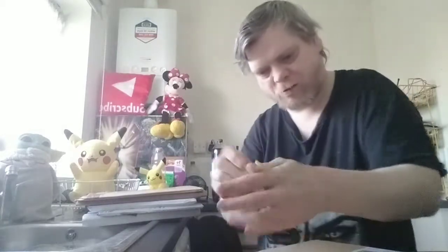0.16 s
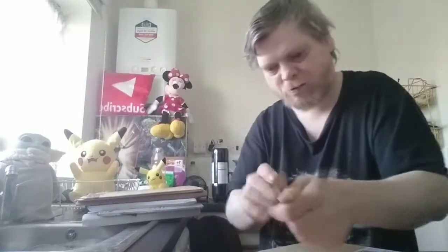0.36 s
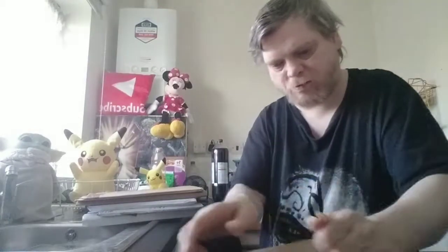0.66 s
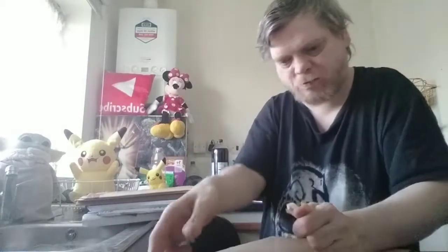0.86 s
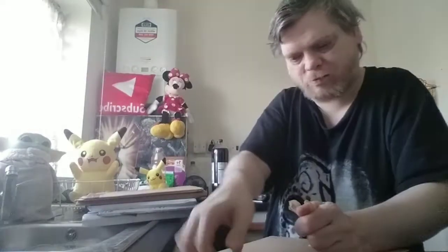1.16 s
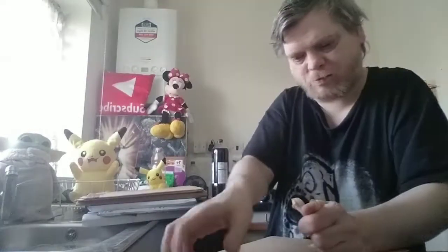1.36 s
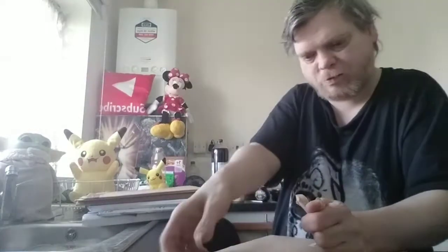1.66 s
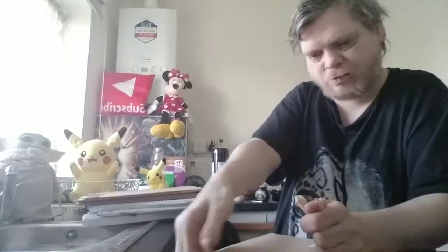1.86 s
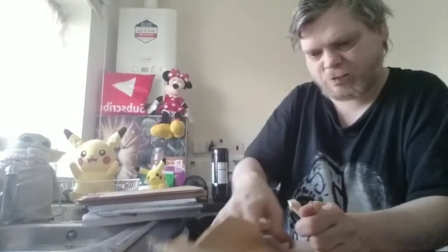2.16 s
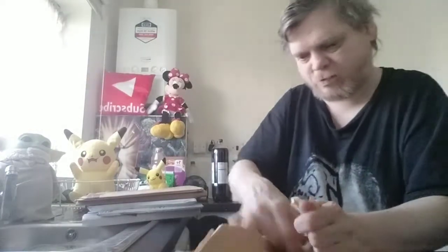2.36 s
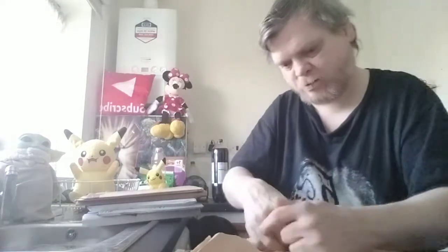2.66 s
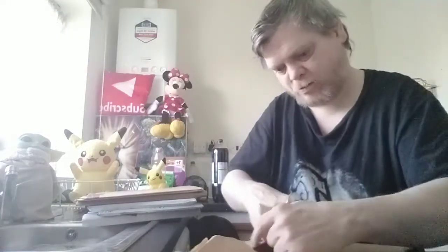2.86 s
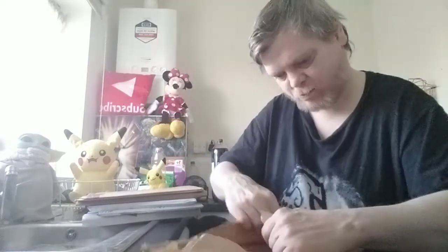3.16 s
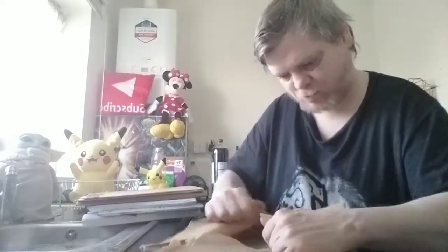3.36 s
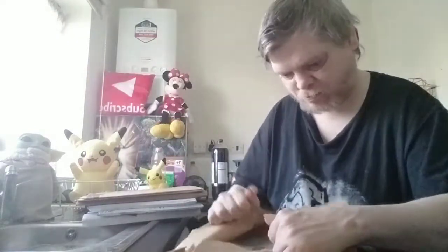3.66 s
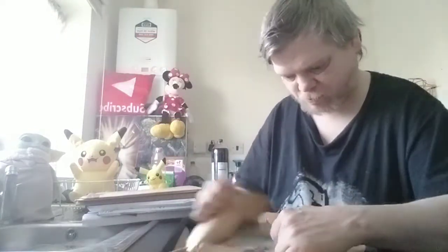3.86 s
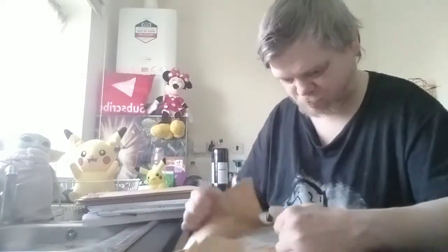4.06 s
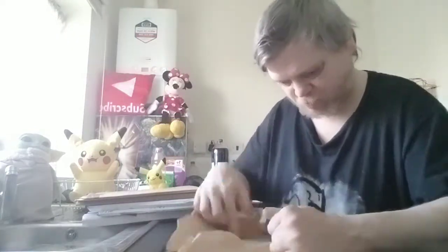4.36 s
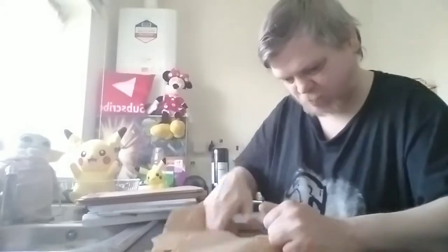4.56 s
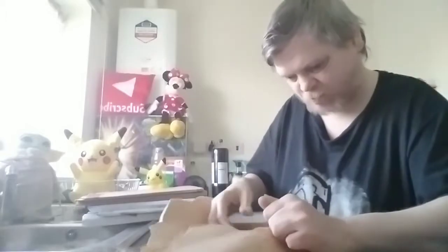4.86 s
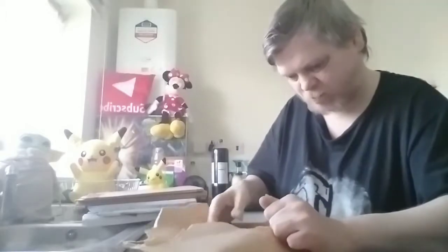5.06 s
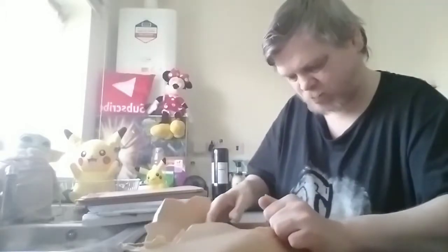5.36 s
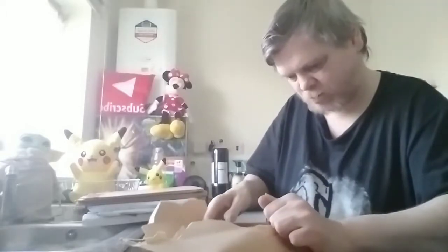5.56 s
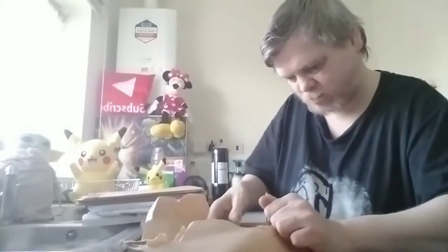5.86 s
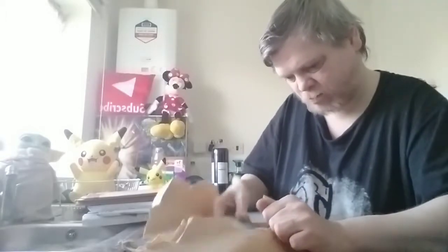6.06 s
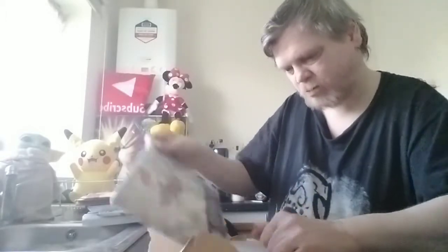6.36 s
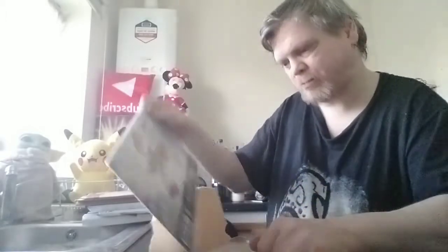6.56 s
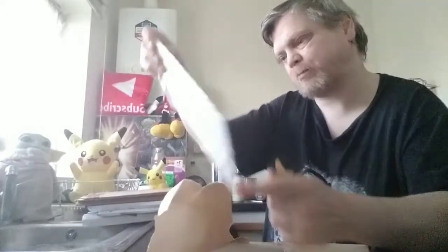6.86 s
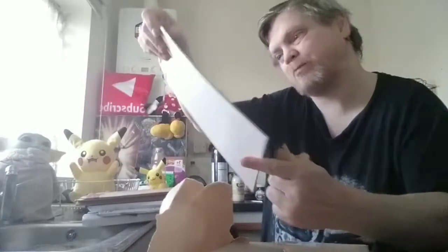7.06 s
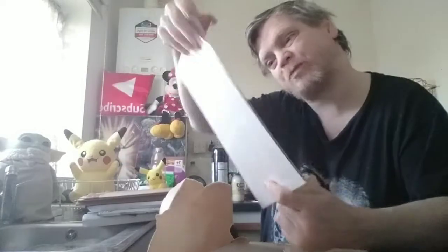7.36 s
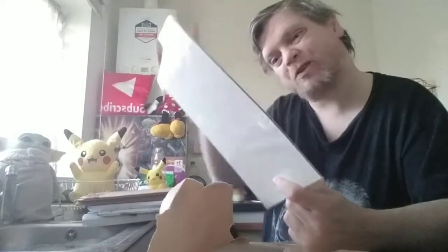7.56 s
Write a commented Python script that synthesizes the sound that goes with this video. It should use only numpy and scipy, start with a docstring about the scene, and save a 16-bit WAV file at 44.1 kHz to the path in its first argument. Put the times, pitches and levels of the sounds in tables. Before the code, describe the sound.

A cardboard mailer is torn open close by with crackling rips, snaps and table thuds, then paper slides softly out.

```python
"""A cardboard mailer is torn open on a table, close up, then paper sheets are drawn out of it.
Fibres crackle in clumps, glued seams and folds snap, the board flexes and booms, the table top thuds.
A smooth hollow hiss fills some quiet moments; a small furnished room answers every snap."""
import sys
import numpy as np
from scipy import signal
from scipy.fft import rfft, irfft, next_fast_len
from scipy.io import wavfile
from scipy.ndimage import uniform_filter1d, map_coordinates

SR = 44100
rng = np.random.default_rng(int(sys.argv[2]) if len(sys.argv) > 2 else 0)


def bounce(signal):
    """Save signal as a 16-bit WAV file at the path given by the first command-line argument."""
    frames = np.transpose(np.atleast_2d(signal))
    limited = np.clip(frames, -1, 1)
    pcm = np.round(limited * 32767).astype(np.int16)
    wavfile.write(sys.argv[1], SR, pcm)


N = 339570

# pulls and slides of the hands: (peak time [s], swell [s], hold [s], fibre level [dB], base fade [s],
# then relative to the fibres: rasp [dB], card [dB], fizz [dB], sheen [dB])
PULLS = [(0.0, .01, 0.0056, -55, .095, -14, -16, -17, -9), (0.161, 0.036, 0, -47, 0.31, -9.5, -11.5, 5, -4),
         (0.328, .15, 0.021, -69.5, 0.1, -6, -26, 14, 4), (0.438, 0.03, .11, -47, 0.22, -7, -44, -4, -12),
         (0.546, .04, 0.0054, -50, 0.092, -6, -6, -7, -12),
         (0.638, 0.096, 0.058, -40.5, 0.39, -1, -10.5, -1.5, -8.5),
         (0.938, 0.015, 0, -33.5, 0.18, -5, -15, 0.5, 2.5),
         (1.027, 0.06, 0.00094, -32.5, 0.16, 5, -2.5, -7, -11.5),
         (1.086, 0.057, 0.045, -55.5, 0.19, -6.5, -12, 1, -8),
         (1.224, 0.27, 0, -56.5, 0.16, -6.5, -9, 2, 11), (1.326, .08, .04, -76, .1, 2, -6, -3, -12),
         (1.382, 0.0083, 0.039, -48.5, 0.082, 3, -7, 3, -3),
         (1.445, 0.032, 0.028, -38, .05, -5, -7.5, 0, -8),
         (1.465, 0.025, 0.035, -43, 0.14, 1.5, -7, -10, -4.5),
         (1.5, .05, 0, -47, 0.9, -11, -19, -1.5, -9.5), (1.548, .02, 0, -47.5, 0.042, -15, -26, 6, 4.5),
         (1.723, 0.14, 0.11, -43, .1, -4.5, -19.5, -3.5, -0.5),
         (1.774, 0.031, 0.011, -30.5, 0.2, -0.5, -7, -2.5, -5),
         (1.902, 0.091, 0, -71, .1, -16, -14, -2, -10.5),
         (1.967, 0.0074, 0.05, -26.5, 0.19, -33, -12, -8, -3.5),
         (2.048, 0.14, 0.024, -28.5, 0.22, 5.5, -0.5, -4.5, 1.5),
         (2.227, 0.048, 0.024, -30, 0.33, 2, -3.5, 3.5, -0.5), (2.19, .1, 0.076, -41, .1, -19, -6.5, -9, 2),
         (2.304, .25, 0.096, -23, 0.16, -6, -10, -4, -4), (2.46, .05, 0.031, -48, 0.42, 3.5, 1.5, -21, -10),
         (2.52, .02, 0.02, -52, 0.08, 0, -11, 7, 5), (2.694, 0.056, 0.043, -30, 0.16, 1, -3, -1, -6.5),
         (2.916, 0.035, 0.003, -36.5, 0.18, 6.5, -1, -4, -5.5),
         (3.056, 0.0067, 0.085, -35, 0.034, 0.5, -7.5, -3.5, -8.5),
         (3.2, 0.29, 0.0064, -38.5, 0.19, -2.5, 3.5, 0.5, -6.5),
         (3.243, .01, 0.015, -33.5, .1, -0.5, 0, -13, -3), (3.272, .02, 0.065, -29, 0.22, 0.5, 3, -0.5, -5),
         (3.463, .06, .02, -56, 0.11, -7, -2, -1, -14), (3.529, 0.018, 0, -55.5, 0.32, 2, 12.5, -7, -15.5),
         (3.602, 0.015, 0.0015, -63.5, 0.081, 26.5, 25, -13, -17),
         (3.703, 0.03, 0.0013, -44, 0.16, -17, 8.5, 7.5, -2.5),
         (3.78, .015, 0.012, -22.5, 0.22, 4, 1, -5, -5),
         (3.905, 0.012, 0.024, -28.5, 0.22, -7, -6, -15, -0.5),
         (4.053, .015, 0.021, -40, .1, -9, -14, 5, 1), (4.07, .005, 0, -24, 0.23, 4.5, -6.5, -3, -6.5),
         (4.154, 0.2, 0.023, -45, 0.36, 5, 10, -10, -10), (4.238, .01, 0, -46.5, 0.16, -2, 13, -3, -14),
         (4.347, .004, 0.018, -30.5, 0.17, -5, -5, -8, -14.5),
         (4.432, 0.031, 0.019, -44.5, .1, 0, 7.5, -19, -13.5),
         (4.526, .008, 0, -42.5, 0.16, 7.5, 3, -29, -29), (4.68, .08, .03, -72, .1, 1, -3, -1, -12),
         (4.743, 0.012, 0.027, -67, .1, 18, 20.5, -12.5, -11.5),
         (4.6, .06, 0.021, -61, 0.15, -16, -14.5, -15, -25),
         (4.806, 0.082, 0.012, -54, 0.098, -3.5, -11, 3, -8.5),
         (4.934, 0.092, .125, -62, .14, -0.5, -22, 0, -20.5),
         (5.192, 0.038, 0.032, -76.5, .15, -2, -19.5, -8, -28),
         (5.27, .1, 0.18, -86.5, 0.085, 1.5, -2, -0.5, -10),
         (5.591, 0.022, 0.03, -50.5, .15, 3.5, 4.5, -0.5, -6.5),
         (5.765, 0.03, 0.046, -66, 0.094, -5, 0, 7, -12),
         (5.888, 0.12, 0.00075, -44, 0.15, -4, -16, 1.5, -7.5),
         (5.966, 0.037, 0.01, -46, 0.16, -31, -18, 0, -16.5),
         (6.119, 0.14, 0.089, -43, 0.22, -3, -5, 0.5, -5), (6.193, .03, 0.11, -43.5, 0.2, 0, -4.5, 0.5, -6),
         (6.486, 0.74, 0.09, -43.5, 0.16, -4, -10.5, -2.5, -9),
         (6.658, 0.18, 0.19, -43.5, 0.41, -6, -39.5, -7, -11),
         (6.95, .2, 0.032, -53, .28, -3, -30, -2, -13.5),
         (7.041, 0.03, 0.01, -51.5, 0.13, 4.5, -22, -3, -4),
         (7.16, 0.47, 0.035, -56, 0.33, -18, -29, 1, -3.5),
         (7.273, .05, .1, -61.5, .1, -23.5, -27, 2, -7.5), (7.43, .05, .03, -76, .04, -20, -25, -5, -15),
         (7.675, 0.037, .05, -55.5, 0.095, -7.5, -15, -7, -20)]
PULL_FADE_SCALES = [0.77, 0.56, 0.63, 0.79, 0.64]  # (fibre, rasp, card, fizz, sheen [x base fade])
# tone of each tearing layer: (frequency [Hz], level [dB])
FIBRE_EQ = [(2820, -41), (4800, -0.5), (5830, 3), (6520, 2.5), (6890, 0.5), (8000, -2.5), (10400, -24.5),
            (17600, -120)]  # bright crackle
RASP_EQ = [(1380, -40.5), (2350, -2), (2690, -2.5), (3070, 2), (4180, -1.5), (5000, -0.5), (6500, -33),
           (11000, -120)]  # coarse upper mids
CARD_EQ = [(380, -33.5), (650, -5), (889, -4.5), (1100, 0), (1230, -2.5), (1690, 3.5), (2600, -5.5),
           (3380, -32), (5720, -120)]  # stiff mids
FIZZ_EQ = [(4410, -35.5), (7500, 1), (10600, -2), (12800, -2.5), (15100, -3), (15700, -7.5)]  # fine top end
# tone of the smooth hiss that stands in for a layer: (frequency [Hz], level [dB])
FIBRE_HISS_EQ = [(2880, -75), (4900, -25), (5720, 1.5), (5970, 2), (6980, -11), (7430, -5), (7900, -27),
                 (10300, -47), (17400, -120)]
RASP_HISS_EQ = [(1350, -83), (2300, -14), (2540, 0.5), (2710, 4), (3320, 0.5), (3510, 1), (3780, -5.5),
                (5000, 1.5), (6500, -21), (11000, -120)]
FIZZ_HISS_EQ = [(4530, -38.5), (7700, -8.5), (8000, -4.5), (10600, -5), (12800, -17), (14900, -7.5),
                (15700, -14)]
# crossfade from crackle to hollow hiss: (time [s], hiss share of the power [0-1])
HISS_SHARE = [(0, 0.15), (.41, 0.02), (.43, 1), (.58, 0.5), (.62, 0.07), (4.86, 0.01), (4.89, 0.5),
              (5.5, 0.8), (5.55, 0), (6.59, 0.1), (6.63, 1), (7.0, 1), (7.2, 0.7), (7.7, 0.63)]
# weight on the mailer: (peak time [s], hold [s], table rumble [dB], hollow boom [dB], flap knock [dB])
SHOVES = [(0.0, 0, -69, -73, -85.5), (0.135, 0.044, -84, -76, -81), (0.43, 0.074, -85, -62.5, -75),
          (0.533, 0.09, -53, -55.5, -55.5), (0.712, 0, -46, -53, -78), (0.827, 0.047, -55, -68, -90),
          (0.939, 0.015, -47, -48, -58), (1.008, 0.039, -37.5, -40.5, -53), (1.15, 0.012, -46, -52.5, -78),
          (1.221, 0, -51, -57, -78), (1.307, 0.047, -49, -73, -90), (1.395, 0.085, -47, -48.5, -54),
          (1.6, 0.11, -63.5, -80, -88), (3.53, 0.0085, -65, -53, -52.5), (5.889, 0, -66, -56, -66),
          (6.2, 0.061, -67, -41.5, -51.5), (1.78, 0, -39.5, -37, -69), (1.892, 0.024, -43, -49.5, -105),
          (1.975, 0.13, -39.5, -37, -43), (2.138, 0, -53, -38, -51), (2.229, 0.18, -39.5, -38, -41.5),
          (2.483, 0.068, -39, -56, -71.5), (2.61, 0, -50, -43, -79), (2.684, 0.042, -42, -36, -35),
          (2.842, .04, -67, -70, -80), (2.921, 0.012, -78, -34.5, -38.5), (3.055, 0.18, -58.5, -56, -49.5),
          (3.192, 0, -40.5, -36, -41), (3.263, .07, -33.5, -27.5, -32.5), (3.6, 0, -51, -44.5, -52),
          (3.71, 0.055, -66, -58, -51), (3.776, 0.039, -36.5, -25, -28.5), (3.91, 0.032, -33.5, -28, -36.5),
          (4.067, 0, -35, -28, -33.5), (4.105, 0.1, -35.5, -35.5, -31.5), (4.295, 0.041, -47, -37.5, -54),
          (5.749, 0.0045, -67, -61.5, -63.5), (4.346, 0.0066, -46, -32, -29),
          (4.434, 0.039, -48, -34.5, -32), (4.53, 0.0012, -47.5, -39, -57.5),
          (4.745, 0.067, -63, -54, -56.5), (4.996, 0.072, -75, -68, -72.5), (5.25, 0.099, -77, -86, -105),
          (5.416, 0.00091, -62, -79.5, -105), (5.597, 0.04, -47.5, -47, -46),
          (5.784, 0.027, -75, -52.5, -66), (5.915, 0.082, -58, -74, -89), (6.106, 0.061, -50, -44, -57),
          (6.28, 0.015, -49.5, -41, -49.5), (6.377, 0.036, -59, -48.5, -56.5),
          (6.497, 0.083, -56, -50.5, -56), (6.681, 0.14, -75, -64, -73), (6.88, 0.21, -81.5, -79.5, -78),
          (7.163, 0.038, -90, -82, -82), (7.352, 0, -86.5, -74, -80), (7.665, 0.042, -84, -68, -78.5)]
# resonances: (frequency [Hz], width [Hz], level [dB])
BOARD_MODES = [(1000, 57, -10), (1695, 38, 2.5), (2130, 57, -15.5), (2336, 51, -1.5), (2710, 13, 4),
               (3080, 31, -3.5), (4008, 120, -1.5), (4620, 22, -5), (5230, 100, -7.5), (5980, 62, -6),
               (6454, 84, -1.5), (7896, 260, 0.5), (7370, 40, -9.5), (9160, 27, -11.5)]  # stiff board
TABLE_MODES = [(49.6, 12, -6), (72, 11, 5), (125, 75, 0)]  # table top
HOLLOW_MODES = [(177, 58, -0.5), (251.5, 100, 0), (305, 92, -0.5)]  # air inside the mailer
FLAP_MODES = [(398, 46, -0.5), (580, 88, 7), (610, 330, 0.5)]  # loose flap
HUM_MODES = [(301, 47, 3), (211, 68, -11.5)]  # faint body of the hiss
# air of the quiet room: (frequency [Hz], level [dB])
ROOM_TONE_EQ = [(18, -36.5), (30, -10.5), (121, 2), (383, -8), (1150, -14.5), (2540, -14), (3670, -21),
                (5730, -26), (16000, -26)]
# seams and folds letting go:
# (time [s], level [dB], pitch [Hz], length [s], treble [dB], share under 2.2 kHz [dB])
SNAPS = [(0.165, -46, 6840, 0.012, -8.5, -10), (0.362, -61.5, 1270, 0.019, -36, -2.5),
         (0.4375, -45, 4950, 0.008, -11, -30), (0.534, -51, 6070, 0.01, -14, -10),
         (0.602, -47, 1300, 0.0065, -25, 3), (0.6233, -47, 7060, 0.009, -8, -24),
         (0.9286, -30.5, 6730, 0.014, -1, -20.5), (1.0053, -21, 3380, 0.0059, -14, -17),
         (1.0238, -19.9, 4470, 0.0033, -17, -18), (1.166, -48.5, 7170, 0.0051, -7.5, -26),
         (1.229, -50.5, 5510, 0.009, 0.5, -10.5), (1.391, -35, 4110, 0.013, -10.5, -17.5),
         (1.4649, -18, 5080, 0.0057, -12, -24), (1.541, -34.5, 7900, 0.0026, -8, -36),
         (1.606, -41, 6890, 0.0054, -8, -29), (1.6902, -48.5, 7170, 0.0062, -9, -25),
         (1.7686, -24, 6780, 0.016, -9.5, -23.5), (1.898, -39.5, 7270, 0.012, -14, -13.5),
         (1.9588, -13.5, 4300, 0.0048, -19, -13), (1.976, -19.0, 5550, 0.0064, -10.5, -12.5),
         (2.0002, -17.5, 4110, 0.0071, -16, -11), (2.005, -19, 4060, 0.0079, -18, -14),
         (2.021, -16, 3290, 0.012, -9, -14), (2.038, -15.5, 6860, 0.013, -5.5, -11.5),
         (2.0422, -20, 4150, 0.012, -7, -11.5), (2.07, -22, 3100, 0.013, -11, -6),
         (2.1747, -34.5, 5100, 0.0028, -9, -13), (2.1905, -33.0, 6330, 0.0044, -9.5, -11.5),
         (2.2063, -24, 5360, 0.012, -6, -13), (2.264, -18, 6200, 0.014, -9, -13),
         (2.2977, -15, 6430, 0.0065, -14.5, -14.5), (2.337, -20.5, 6630, 0.0068, -11, -15.5),
         (2.385, -15, 4190, 0.0075, -11, -23), (2.3963, -17.5, 6480, 0.0023, -11, -17.5),
         (2.4047, -17, 4750, 0.011, -11, -22.5), (2.4963, -28.5, 3380, 0.0033, -26, -10),
         (2.521, -39.5, 6610, 0.009, -8.5, -12.5), (2.6665, -29.5, 5720, 0.012, -8, -9.5),
         (2.6775, -28, 5770, 0.0096, -10.5, -7.5), (2.864, -50.5, 3420, 0.021, -10.5, -17),
         (2.915, -26, 1330, 0.0057, -22.5, -2), (3.0536, -32, 3290, 0.0049, -15, -14),
         (3.075, -33.5, 3380, 0.0047, -14, -9.5), (3.109, -31.5, 4110, 0.0071, -16, -11),
         (3.175, -33, 1670, 0.011, -11, -6), (3.245, -20, 2020, 0.0051, -27, -4),
         (3.2696, -17, 1270, 0.0052, -21.5, -1), (3.291, -20, 6180, 0.016, -11.5, -6.5),
         (3.3245, -22.5, 1740, 0.0051, -14.5, -3.5), (3.5225, -38, 2360, 0.0051, -33.5, -1.5),
         (3.5699, -39, 2430, 0.0045, -42, -3), (3.5995, -34, 1160, 0.0057, -43, -0.5),
         (3.6792, -41.5, 2020, 0.0078, -24, 0), (3.6974, -32, 1140, 0.0083, -15.5, 0),
         (3.7623, -18.5, 2300, 0.015, -14, -2.5), (3.7732, -8.5, 5250, 0.0059, -20, -12),
         (3.7864, -9.5, 1850, 0.009, -17, -5), (3.7917, -13.5, 2490, 0.012, -19, -8),
         (3.806, -22, 2560, 0.0093, -17.5, -8), (3.9017, -8.5, 3960, 0.0067, -23, -10),
         (3.9188, -15, 4860, 0.0095, -17, -7.5), (3.932, -26, 6350, 0.0066, -17, -8.5),
         (4.054, -27.5, 6730, 0.009, -12.5, -10.5), (4.0677, -9.5, 4450, 0.0055, -13, -6),
         (4.1118, -18, 1110, 0.0057, -20, -0.5), (4.235, -27, 1700, 0.01, -25.5, -2),
         (4.3452, -18, 1570, 0.0045, -19.5, -2.5), (4.4259, -30.5, 2150, 0.0028, -28.5, -0.5),
         (4.47, -37, 1480, 0.012, -36, 0), (4.5277, -23.5, 4930, 0.0047, -38, -5),
         (4.5763, -41, 6990, 0.0056, -25, -19.5), (4.742, -37, 1200, 0.0065, -45, -0.5),
         (5.5755, -41, 1310, 0.0075, -22, -1.5), (5.796, -50, 1550, 0.0065, -18, -0.5),
         (5.864, -44.2, 7290, 0.017, -8.5, -34), (5.9633, -34, 7010, 0.0025, -9, -49),
         (5.993, -47.5, 6330, 0.0097, -14, -8.5), (6.1896, -34, 6670, 0.011, -10.5, -10),
         (6.2335, -24.5, 7880, 0.002, -9, -16), (6.2701, -33.5, 4150, 0.0073, -8, -16),
         (7.0335, -42.5, 5490, 0.0081, -16, -32.5), (7.2685, -43, 7510, 0.0029, -7, -41.5),
         (7.446, -62.5, 7490, 0.005, -11.5, -27.5), (7.6625, -58, 7210, 0.0075, -17.5, -15.5)]
# base tone of a snap: (frequency [Hz], level [dB])
SNAP_EQ = [(410, -41), (700, -15.5), (2100, -2.5), (3450, -8), (4090, -2.5), (5980, -6.5), (6730, -2),
           (14400, -20), (16000, -23.5)]
# decay of the room: (frequency [Hz], t60 [s])
ROOM_DECAY = [(200, 1), (1500, 0.1), (5000, 0.2), (14000, 0.16)]
# soft blows: (time [s], level [dB], pitch [Hz], t60 [s])
TABLE_THUDS = [(0.523, -38, 91.4, 0.17), (0.706, -39, 86, 0.25), (0.938, -33, 83, 0.2),
               (1.041, -17, 78, 0.24), (1.47, -31, 78.5, 0.19), (1.768, -34.5, 109, 0.18),
               (2.1, -26, 96.9, 0.17), (2.491, -20, 80, 0.34), (2.719, -41, 76, 0.095),
               (2.919, -39, 121, 0.14), (3.179, -37, 122, 0.34), (3.277, -27.5, 117, 0.2),
               (3.779, -27.5, 118, 0.24), (3.905, -20.5, 78.1, 0.18), (4.129, -39.5, 82.6, 0.19),
               (4.418, -31.5, 118.4, 0.21), (5.404, -49.5, 105, 0.15), (5.598, -41, 75, 0.18),
               (6.108, -30, 116, 0.15), (6.268, -48, 110, 0.16)]  # a hand lands on the table top
MAILER_KNOCKS = [(0.542, -35, 291, 0.061), (0.601, -32.5, 371, 0.031), (1.012, -34, 194, 0.083),
                 (1.768, -34, 194, 0.085), (1.873, -41, 196, 0.14), (2.005, -35, 293, 0.051),
                 (2.126, -24.5, 191, 0.11), (2.213, -27, 175, 0.08), (2.349, -16.5, 210, 0.044),
                 (2.688, -24.5, 568, 0.05), (2.914, -13.5, 199, 0.043), (3.12, -29.5, 557, 0.06),
                 (3.266, -15, 210, 0.073), (3.299, -16.5, 207, 0.11), (3.571, -30, 167, 0.041),
                 (3.598, -37.5, 196, 0.1), (3.779, -13, 285, 0.14), (3.9, -13, 191, 0.045),
                 (4.064, -19, 312, 0.036), (4.102, -19.5, 315, 0.13), (4.134, -22, 315, 0.15),
                 (4.343, -25.5, 630, 0.2), (4.422, -20.5, 536, 0.17), (4.444, -13.5, 584, 0.04),
                 (4.524, -28, 196, 0.078), (4.74, -38, 624, 0.072), (5.572, -35, 293, 0.096),
                 (5.797, -44, 199, 0.1), (6.117, -25, 288, 0.037), (7.33, -57.5, 355, 0.08),
                 (7.658, -55.5, 326, 0.066)]  # on the hollow mailer and its flap


def amp(db):
    """Decibels to gain."""
    return 10 ** (np.asarray(db) / 20)


def unit(x):
    """Scaled to rms 1."""
    return x / np.sqrt(np.mean(x ** 2) + 1e-20)


def along(points, hz):
    """Read (frequency [Hz], value) points on a log axis."""
    f, v = np.transpose(points)
    return np.interp(np.log(hz + 1), np.log(f + 1), v)


def filtered(x, response):
    """x through a complex frequency response."""
    m = next_fast_len(len(x) + 8192)
    return irfft(rfft(x, m) * response(np.fft.rfftfreq(m, 1 / SR)), m)[:len(x)]


def coloured(x, eq):
    """x through an EQ curve, at rms 1."""
    return unit(filtered(x, lambda hz: amp(along(eq, hz))))


def resonance(modes, hz):
    """Response of a bank of resonators with alternating polarity."""
    return sum((-1) ** k * amp(db) * 1j * hz * width / (centre ** 2 - hz ** 2 + 1j * hz * width)
               for k, (centre, width, db) in enumerate(modes))


def resonated(x, modes, low_hz, high_hz):
    """x through resonators and a band-pass, at rms 1."""
    band = lambda hz: 1 / (1 + (hz / high_hz) ** 6) / (1 + (low_hz / (hz + 1)) ** 6)
    return unit(filtered(x, lambda hz: resonance(modes, hz) * band(hz)))


def gestures(peak_s, hold_s, level_db, swell_s, fade_s):
    """One layer's envelope: each move swells, holds and fades, about 30 dB a slope; their powers add."""
    t = np.arange(0, N + 32, 32)[:, None] / SR
    before = np.maximum(peak_s - t, 0) / swell_s
    after = np.maximum(t - peak_s - hold_s, 0) / fade_s
    shape_db = -30 * (before ** 0.89 + after ** 0.89 + 0.12 * after ** 4)  # last term cuts the tail short
    gain = np.sqrt(np.sum(amp(level_db + shape_db) ** 2, axis=1))
    return np.interp(np.arange(N) / SR, t[:, 0], gain)


def crossfade(rough, smooth):
    """Equal-power fade between the rough sound and the smooth one, following HISS_SHARE."""
    share = np.interp(np.arange(N) / SR, *np.transpose(HISS_SHARE))
    return np.sqrt(1 - share) * rough + np.sqrt(share) * smooth


def fibre_clumps(per_s, spread_db, decay_s):
    """Envelope of fibre bundles that break at random: sudden starts, quick fades."""
    breaks = rng.random(N) < per_s / SR
    strength = amp(spread_db * np.minimum(rng.exponential(size=N), 3))
    feedback = np.exp(-1 / (decay_s * SR))
    return unit(signal.lfilter([1], [1, -feedback], breaks * strength))


def patchy_noise(depth_db, frame):
    """Noise with patches of random gain; a longer frame gives narrower, longer patches."""
    spectra = signal.stft(rng.standard_normal(N), nperseg=frame)[2]
    patches = uniform_filter1d(rng.standard_normal(spectra.shape), size=4, axis=0)
    patches = uniform_filter1d(patches, size=3, axis=1)
    return signal.istft(spectra * amp(depth_db * unit(patches)), nperseg=frame)[1][:N]


def tearing():
    """The same breaking bundles sound in every part of the board; the harder the pull, the lumpier."""
    peak_s, swell_s, hold_s, fibre_db, fade_s, *offsets_db = np.transpose(PULLS)
    gains = [gestures(peak_s, hold_s, fibre_db + offset_db, swell_s, fade_s * scale)
             for offset_db, scale in zip([0, *offsets_db], PULL_FADE_SCALES)]
    force = np.clip((20 * np.log10(gains[0] + 1e-9) + 45) / 30, 0.1, 1)
    grain = 1 + 0.55 * force * fibre_clumps(per_s=150, spread_db=2.5, decay_s=0.003)
    grain /= np.sqrt(uniform_filter1d(grain ** 2, size=4000))  # keep the texture, level the loudness
    crackle = grain * patchy_noise(depth_db=3, frame=512)
    crackle = filtered(crackle, lambda hz: 1 + 0.2 * resonance(BOARD_MODES, hz))
    hiss = patchy_noise(depth_db=3, frame=2048)
    fibre = crossfade(coloured(crackle, FIBRE_EQ), coloured(hiss, FIBRE_HISS_EQ))
    rasp = crossfade(coloured(crackle, RASP_EQ), coloured(hiss, RASP_HISS_EQ))
    fizz = crossfade(coloured(crackle, FIZZ_EQ), coloured(hiss, FIZZ_HISS_EQ))
    card = coloured(crackle, CARD_EQ)
    sheen = filtered(fizz, lambda hz: 1 / (1 + (12000 / (hz + 1)) ** 30))  # split off above 12 kHz
    layers = [fibre, rasp, card, fizz - sheen, unit(sheen)]
    return sum(gain * layer for gain, layer in zip(gains, layers))


def pressing():
    """Hands push the mailer about: uneven shoves shake the table top, the mailer's hollow and its flap."""
    peak_s, hold_s, table_db, hollow_db, flap_db = np.transpose(SHOVES)
    wobble_hz, wobble_db = 40, 2.2
    knots = rng.standard_normal(int(N * wobble_hz / SR) + 4)
    wobble = map_coordinates(knots, [np.arange(N) * wobble_hz / SR])
    push = amp(wobble_db * wobble) * rng.standard_normal(N)
    rumble = resonated(rng.standard_normal(N), TABLE_MODES, low_hz=43, high_hz=140)
    boom = resonated(push, HOLLOW_MODES, low_hz=110, high_hz=430)
    flap = resonated(push, FLAP_MODES, low_hz=270, high_hz=940)
    hum = unit(filtered(rng.standard_normal(N), lambda hz: resonance(HUM_MODES, hz)))
    return (rumble * gestures(peak_s, hold_s, table_db, swell_s=0.044, fade_s=0.14)
            + crossfade(boom, hum) * gestures(peak_s, hold_s, hollow_db, swell_s=0.014, fade_s=0.11)
            + flap * gestures(peak_s, hold_s, flap_db, swell_s=0.026, fade_s=0.11))


def room_tone():
    """A bed of faint, steady air."""
    return amp(-81) * coloured(rng.standard_normal(N), ROOM_TONE_EQ)


def snap_tone(hz, pitch_hz, treble_db, body_db):
    """One snap's EQ: a bump at its pitch, a tilt on either side, and a fresh mix of the board's modes."""
    ratio = (hz + 1) / pitch_hz
    octaves, treble_span = np.log2(ratio), np.log2(10000 / min(pitch_hz, 5000))
    bump_db = 9 * np.exp(-(np.log(ratio) / 0.17) ** 2)
    highs_db = (treble_db + 17.5) * np.clip(octaves / treble_span, 0, 1.3)
    mids_db = 0.22 * (body_db + 10) * np.clip(-octaves, 0, 2)  # little body, little middle
    modes = [(centre, width, db + rng.normal(0, 5)) for centre, width, db in BOARD_MODES]
    return amp(along(SNAP_EQ, hz) + bump_db + highs_db + mids_db) * (1 + 0.83 * resonance(modes, hz))


def snaps():
    """Seams and folds let go: each is a few milliseconds of dense noise that rings the board."""
    out, t = np.zeros(N + SR), np.arange(SR // 10) / SR
    for start_s, db, pitch_hz, length_s, treble_db, body_db in SNAPS:
        envelope = (1 - np.exp(-t / 0.0003)) * np.exp(-(t / length_s) ** 4)
        bite = 1 + 1.2 * np.exp(-t / 0.0013)  # the first instant is the hardest
        burst = rng.standard_normal(len(t)) * envelope * bite
        burst = filtered(burst, lambda hz: snap_tone(hz, pitch_hz, treble_db, body_db))
        body = filtered(burst, lambda hz: 1 / (1 + (hz / 2200) ** 8))
        body_share = min(amp(body_db) ** 2, 0.93)
        snap = np.sqrt(body_share) * unit(body) + np.sqrt(1 - body_share) * unit(burst - body)
        out[round(start_s * SR):][:len(t)] += amp(db) * snap * np.sqrt(length_s / t[-1])
    return out[:N]


def room_reverb(x):
    """A noise tail in which each frequency dies at its own speed; a new tail every third of a second."""
    out, hop = np.zeros(N + SR), SR // 3
    for start in range(0, N, hop):
        hz, t, spectra = signal.stft(rng.standard_normal(hop), SR, nperseg=256)
        decay = amp(-60 * t / along(ROOM_DECAY, hz)[:, None])
        tail = signal.istft(spectra * decay, SR, nperseg=256)[1]
        wet = signal.fftconvolve(x[start:start + hop], tail / np.linalg.norm(tail))
        out[start:start + len(wet)] += wet
    return out[:N]


def soft_blows(hits, attack_s, overtone_gain):
    """A struck table top or mailer gives a damped ring with a weaker, quicker upper mode."""
    out, t = np.zeros(N + SR), np.arange(SR // 2) / SR
    for start_s, db, hz, t60 in hits:
        attack, decay = 1 - np.exp(-t / attack_s), amp(-60 * t / t60)
        fundamental = np.sin(2 * np.pi * hz * t) * decay
        overtone = overtone_gain * np.sin(2 * np.pi * 2.3 * hz * t) * decay ** 2
        out[round(start_s * SR):][:len(t)] += amp(db) * attack * (fundamental + overtone)
    return out[:N]


def scene():
    """The mono mix; only the snaps feed the reverb."""
    cracks = snaps()
    mix = tearing() + cracks + amp(-6) * room_reverb(cracks) + pressing() + room_tone()
    mix += soft_blows(TABLE_THUDS, attack_s=0.018, overtone_gain=0.05)  # the table's low ring blooms
    mix += soft_blows(MAILER_KNOCKS, attack_s=0.0012, overtone_gain=0.28)  # lighter: speaks at once
    return mix[None]


def record(dry):
    """The input soft-clips the loudest snaps and keeps nothing above its band limit."""
    ceiling, band_limit_hz = 1.05, 15800
    clipped = dry[0] / (1 + np.abs(dry[0] / ceiling) ** 8) ** (1 / 8)
    return filtered(clipped, lambda hz: hz < band_limit_hz)[None]


dry = scene()
out = record(dry)
bounce(out)
```